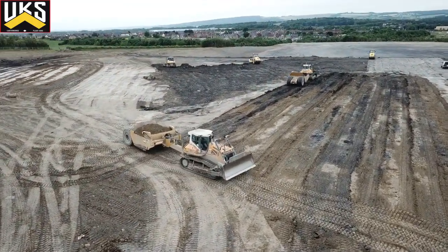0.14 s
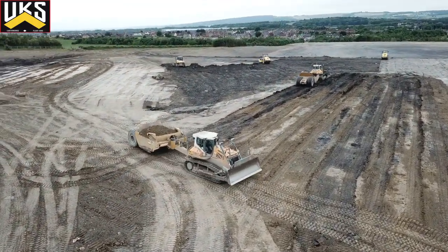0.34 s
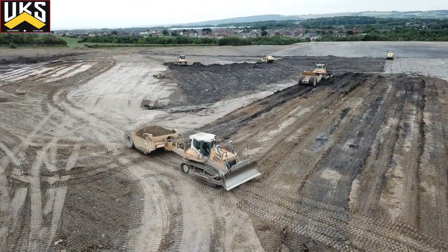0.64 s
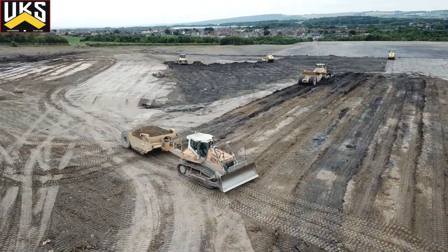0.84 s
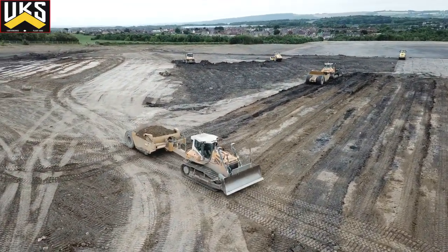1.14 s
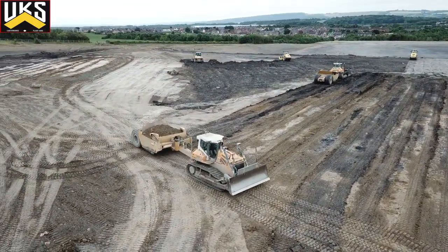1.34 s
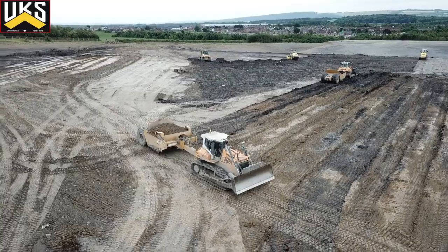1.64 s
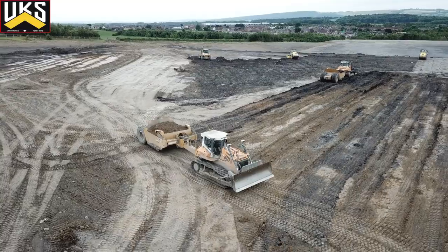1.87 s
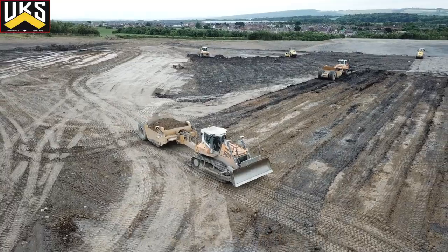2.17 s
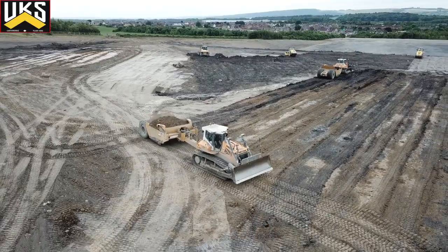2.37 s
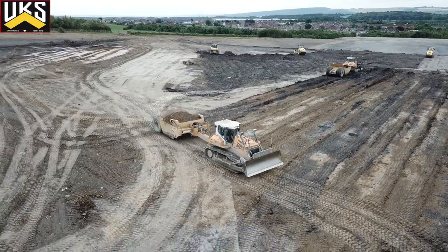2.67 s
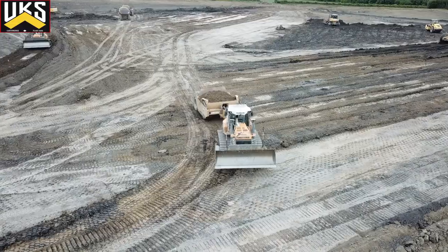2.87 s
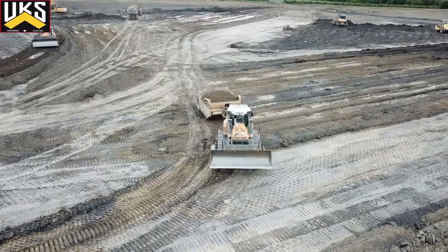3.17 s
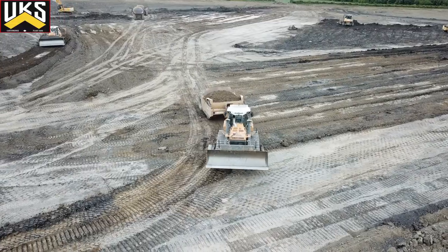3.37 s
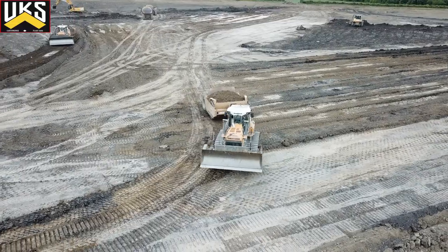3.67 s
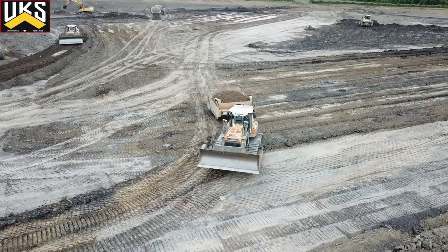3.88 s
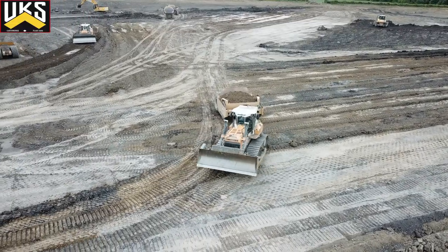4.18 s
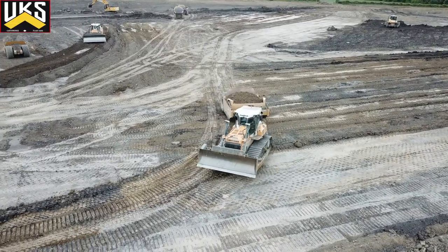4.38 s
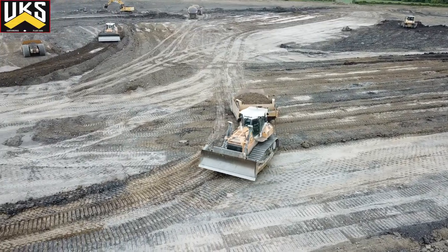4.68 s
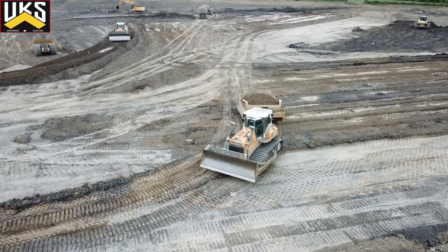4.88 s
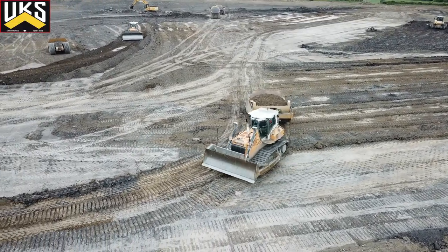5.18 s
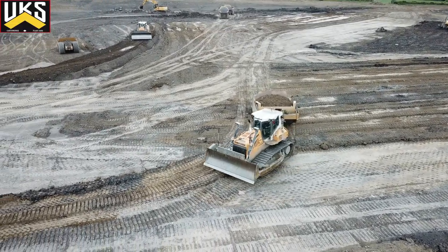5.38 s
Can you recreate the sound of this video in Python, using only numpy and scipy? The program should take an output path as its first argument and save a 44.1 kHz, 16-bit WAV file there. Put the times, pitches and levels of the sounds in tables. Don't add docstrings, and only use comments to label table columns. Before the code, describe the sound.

A tracked dozer roars and clanks over soft ground, fades to a blink of silence, then slowly returns quieter with clanks near the end.

```python
import sys
import numpy as np
from scipy import signal
from scipy.fft import rfft, irfft
from scipy.io import wavfile

SR = 44100
rng = np.random.default_rng(int(sys.argv[2]) if len(sys.argv) > 2 else 0)


def master_out(mix):
    frames = np.transpose(np.atleast_2d(mix))
    ceiling = np.clip(frames, -1, 1)
    pcm = np.round(ceiling * 32767).astype(np.int16)
    wavfile.write(sys.argv[1], SR, pcm)


def volts(x):
    e = np.asarray(x, float) / 20
    return 10 ** e


N = 243431
PASS = int(2.9 * SR)
REPEAT_S = 2.66934
SILENT_S = (2.7435, 2.7515)

# (time [s], roar [dB], hiss relative to roar [dB])
FADER_FIRST = [(0, -46, -41), (.2, -49.5, -42.5), (.44, -45.5, -38), (.8, -44, -38.5), (1.26, -43, -36.5),
               (1.74, -42.5, -39.5), (2.01, -45, -39), (2.26, -49.5, -39), (2.47, -53.5, -38),
               (2.58, -55.5, -40.5), (2.65, -62, -41), (2.69, -66.5, -39), (2.72, -73.5, -37),
               (2.743, -95, -39)]
# (time [s], roar [dB], hiss relative to roar [dB])
FADER_SECOND = [(2.752, -91, -39), (2.78, -82, -33.5), (2.83, -72, -45), (2.9, -74, -32), (3.03, -64, -35),
                (3.2, -62.5, -36), (3.41, -59.5, -38), (3.8, -59, -36), (4.11, -55.5, -37.5),
                (4.24, -51, -37.5), (4.46, -48.5, -39), (4.74, -48.5, -38.5), (5.0, -50.5, -38.5),
                (5.3, -48, -41), (5.52, -51.5, -37)]
# (time [s], peak [dB], low ring [dB], bright ring [dB], rattle length [ms])
CLANKS = [(0.019, -38.5, -3.2, -9.5, 14), (0.052, -69, -16.9, -29, 2.2), (0.094, -50.5, -25, -21, 2.7),
          (0.132, -68, 13.5, -32, 11.9), (0.151, -53.5, 4, -3, 3.9), (0.177, -39, 0, -15, 10.4),
          (0.195, -48.5, -2, -27, 2.9), (0.226, -48.5, 27, -25, 2.6), (0.262, -44.5, 4, -15.8, 2.6),
          (0.287, -41, 14, -14, 1.6), (0.339, -45.5, -3, -3, 13), (0.356, -53.5, 16, -11, 5.5),
          (0.386, -64.5, -3, -6, 15.9), (0.411, -52, 11, -11, 2.4), (0.444, -39, -4.5, -8, 16),
          (0.464, -43, -5.8, -30, 9.2), (0.502, -43.5, -32, -24, 10), (0.556, -43.5, 0, -11, 5.3),
          (0.569, -52.5, -2, -21, 8.7), (0.581, -35, 7.5, -9, 6.9), (0.596, -41, 2, -10, 8.1),
          (0.634, -44, -16.5, -4, 15), (0.659, -48.5, 20, -34, 4.9), (0.689, -41.5, -4, -4, 11),
          (0.708, -35.5, 5, -10.5, 3.9), (0.771, -41, 1, -21, 1.5), (0.818, -43.5, 10, -15, 12),
          (0.83, -41, -14.5, -13, 3.5), (0.863, -39.5, -29, -27, 2.5), (0.901, -41.5, -0.6, -10, 2.6),
          (0.939, -52, 3, -17.0, 2.4), (0.956, -34, 2, -19, 2.3), (0.974, -32, -3, -16.5, 5.9),
          (0.991, -40, -10, -37, 1.1), (1.031, -32.5, -5, -15.5, 6.1), (1.062, -50, 16, -9, 7.8),
          (1.085, -38.5, 3.5, -12, 1.4), (1.111, -56, 18, -27, 6), (1.126, -32.5, -15, -17.5, 3.6),
          (1.141, -40, -16, -21, 21), (1.163, -35, -12.5, -10, 8.2), (1.179, -39, 5, -10, 5.5),
          (1.223, -33.5, -3, -18, 2.3), (1.24, -30.5, -14, -22, 8.1), (1.292, -40, -19, -9, 9.4),
          (1.321, -38.5, -26, -14, 9.6), (1.346, -40, 2.5, -16, 16), (1.386, -30, -8.5, -18, 11.4),
          (1.423, -35.5, -39, -10, 4.6), (1.483, -63, 22.5, -42, 2), (1.495, -50, -26, -8, 2.6),
          (1.506, -32.5, -0.5, -20.5, 9.1), (1.518, -42, -26, -6, 3.2), (1.557, -32.5, -30, -16, 3.1),
          (1.575, -63.5, 0, 11, 10.4), (1.608, -37, 1, -12, 4.2), (1.643, -31.5, 4, -23, 8.5),
          (1.684, -43, 10.5, -3, 1.8), (1.743, -43, 2, -26, 3.3), (1.763, -31, -7.5, -12, 5.5),
          (1.782, -37.5, -34, -19, 2.5), (1.812, -38.8, -10.5, -5.5, 1.8), (1.855, -58, 12, -15, 5.7),
          (1.875, -40, 4, -33, 3.1), (1.904, -37, -22, -23.5, 2.2), (1.916, -36.5, -0.5, -19, 6.9),
          (1.95, -44, -16, -48, 12), (2.001, -41.5, -25, -36, 1.7), (2.031, -36, -12, -11, 6.6),
          (2.081, -38.5, -8.5, -42, 2), (2.11, -61, -6, -36, 2.7), (2.137, -39.8, -2, -56, 4),
          (2.16, -34, -24, -20, 2), (2.212, -44, 5.5, -12.5, 1.4)]
# (time [s], peak [dB], low ring [dB], bright ring [dB], rattle [ms])
LATE_CLANKS = [(4.936, -46, 7, -54, 1.9), (4.97, -39, -29, -67, 1.7), (5.002, -41.5, 1.5, -21, 5.1),
               (5.068, -42, 9, -21, 3.6), (5.093, -36, -25, -10.5, 4.4), (5.145, -41, 8, -13.5, 0.87),
               (5.175, -50, -26, -18, 26), (5.199, -41.5, -12, -14, 15), (5.233, -40.5, 4, -29, 2.5),
               (5.253, -50, -6, -19, 2.4), (5.274, -45.5, 8, -12, 1.8), (5.326, -46.2, 11, -35, 7.2),
               (5.337, -51.5, 0, -18.2, 3.6), (5.355, -40, 5, -12, 3.7), (5.376, -43, 0, -26, 9.8),
               (5.408, -42, 4, -43, 5.6), (5.462, -40.5, 3, -17.5, 24), (5.48, -41.5, -4, -21.2, 4.3),
               (5.502, -35.5, -11.5, -25, 3.9)]
# (frequency [Hz], level [dB], time to fall 60 dB [s])
LOW_RING = [(314, -14.5, 0.01), (409, -13, 0.055), (482, -1, 0.048), (569, -8.5, 0.078), (698, -5.5, 0.069)]
# (frequency [Hz], level [dB], time to fall 60 dB [s])
MID_RING = [(781, 2, 0.044), (946, -1.5, 0.076), (1097, 1, 0.04), (1232, 0, 0.049), (1327, 2.5, 0.042),
            (1470, -7, 0.075), (1672, -5.5, 0.029), (1862, -8, 0.047)]
# (frequency [Hz], level [dB], time to fall 60 dB [s])
BRIGHT_RING = [(1990, 4, 0.025), (2310, 2, 0.02), (2670, -19, .012), (3060, -2, 0.031), (3300, -2.5, 0.022),
               (3330, -17.5, 0.014), (4460, -28, .01), (4590, -8.5, 0.0087), (4980, -13, 0.013)]
# (lowest frequency [Hz], highest frequency [Hz])
RING_BANDS_HZ = [
    (240, 980),
    (450, 2280),
    (1400, 5600),
]
# (frequency [Hz], level per Hz [dB])
ROAR = [(40, -28), (62, -37), (150, -14.5), (380, 0), (712, 0.5), (1350, 0.5), (1950, -10.5), (2150, -16),
        (2600, -18.5), (3100, -17), (3650, -20), (3950, -30.5), (5500, -33.5), (6000, -48.5)]
# (time into the pass [s], roar tilt about 1 kHz [dB per octave])
TURNING = [
    (0, -1),
    (.25, 3.2),
    (.45, -0.8),
    (1.0, 0),
    (1.6, -0.03),
    (2.2, -0.5),
    (2.9, 1),
]
# (frequency [Hz], width [Hz], level relative to roar [dB])
ENGINE_HUM = [(283.4, 15, -33.5), (560, 12, -19.5), (715, 17, -12.5), (1995, 77, -29), (2421, 37, -32),
              (2970, 42, -34), (3127, 20, -32), (3360, 50, -34), (3500, 35, -41), (4340, 37, -43.5),
              (4450, 17, -43), (4550, 17, -43)]
# (frequency [Hz], level per Hz [dB])
HISS = [(4500, -9), (6000, -1.5), (7000, -6), (8200, -4.5), (9400, -1), (12500, -3.5), (13600, -3.5),
        (13900, -22)]
# (frequency [Hz], width [Hz], level relative to hiss [dB])
WHINE = [(7070, 670, -10), (9600, 410, -15.5), (10880, 860, -7.5), (13230, 480, -4)]
# (time into the pass [s], level [dB])
WHINE_SWELL = [
    (0, 18),
    (.3, -1),
    (.8, -18),
    (1.4, 0),
    (1.7, 4),
    (2.4, 5),
    (2.9, 2),
]


def rms_one(x):
    return x / np.sqrt(np.mean(x ** 2) + 1e-20)


def drift(rate):
    r = np.exp(-80 * np.pi * rate / SR)
    white = rng.standard_normal(PASS // 40 + 2002)
    slow = signal.lfilter([1], [1, -2 * r, r * r], white)[2000:]
    return np.interp(np.arange(PASS) / 40, np.arange(len(slow)), rms_one(slow))


def ring(force, hz, t60):
    r = volts(-60 / (t60 * SR))
    w = 2 * np.pi * hz / SR
    return signal.lfilter([0, np.sin(w)], [1, -2 * r * np.cos(w), r * r], force + 1e-18)


def narrow_noise(hz, width_hz):
    t60 = np.log(1000) / np.pi / width_hz
    once = ring(rng.standard_normal(PASS), hz, t60)
    return rms_one(ring(once, hz, t60))


def coloured(spectrum):
    hz, db = np.transpose(spectrum)
    bins = np.fft.rfftfreq(PASS, 1 / SR) + 1
    gain = volts(np.interp(np.log(bins), np.log(hz), db))
    return rms_one(irfft(rfft(rng.standard_normal(PASS)) * gain, PASS))


def roar(patchy_db, throb_db):
    body = rfft(coloured(ROAR))
    together = drift(25)
    tilt_db = np.interp(np.arange(PASS) / SR, *np.transpose(TURNING))
    place = np.log2(np.fft.rfftfreq(PASS, 1 / SR) / 1000 + 1e-6) * 1.5
    out = np.zeros(PASS)
    for band in range(-8, 5):
        share = np.clip(1 - np.abs(place - band), 0, 1)
        octaves = max(band, -4) / 1.5
        flicker_db = patchy_db * drift(16) + throb_db * together
        out += irfft(body * share, PASS) * volts(flicker_db + tilt_db * octaves)
    return rms_one(out)


def engine_hum():
    load = np.clip(np.arange(PASS) / SR / 0.63, .4, 1)
    return load * sum(volts(level_db) * narrow_noise(hz, width_hz) for hz, width_hz, level_db in ENGINE_HUM)


def whine():
    return sum(volts(level_db) * narrow_noise(hz, width_hz) for hz, width_hz, level_db in WHINE)


def hiss(patchy_db):
    tones = whine()
    s, swell_db = np.transpose(WHINE_SWELL)
    swell = volts(np.interp(np.arange(PASS) / SR, s, swell_db))
    total = np.sqrt(1 + swell ** 2 * np.mean(tones ** 2))
    return (coloured(HISS) + swell * tones) / total * volts(patchy_db * drift(30))


def rattles(length_ms, touches_per_s):
    age_ms = np.arange(1500) / SR * 1000
    touched = rng.random((len(length_ms), 1500)) < touches_per_s / SR
    touched[:, 0] = True
    fade = np.exp(-(age_ms / np.clip(length_ms[:, None], 3, 25)) ** 4)
    rattle = touched * fade * rng.choice([-1, 1], touched.shape)
    rattle[:, 0] *= 1.8
    return rattle / np.sqrt(np.sum(rattle ** 2, axis=1, keepdims=True))


def tracks(strike_db, thump_db, touches_per_s, spread_db):
    contacts = np.array(list(CLANKS) + list(LATE_CLANKS))
    time_s, peak_db, low_db, bright_db, length_ms = contacts.T
    strength_db = peak_db - fader(time_s)[0] + strike_db
    pass_s = time_s - REPEAT_S * (time_s > REPEAT_S + .1)
    start = np.round((pass_s - .001) * SR).astype(int)
    rattle = rattles(length_ms, touches_per_s)
    at = np.minimum(start[:, None] + np.arange(1500), PASS - 1).ravel()
    out = np.zeros(PASS)
    families = zip((LOW_RING, MID_RING, BRIGHT_RING), (low_db, 0, bright_db), RING_BANDS_HZ)
    for modes, family_db, band_hz in families:
        family = np.zeros(PASS)
        for hz, level_db, t60 in modes:
            chance_db = spread_db * rng.standard_normal(len(contacts))
            size = volts(strength_db + family_db + level_db + chance_db)
            size = size * rng.choice([-1, 1], len(contacts))
            force = np.bincount(at, (size[:, None] * rattle).ravel(), PASS)
            family += ring(force, hz, t60)
        out += signal.sosfilt(signal.butter(4, band_hz, "band", fs=SR, output="sos"), family)
    weight = np.bincount(start, volts(strength_db + thump_db), PASS)
    soft = signal.sosfilt(signal.butter(2, 70, fs=SR, output="sos"), weight)
    return out + ring(soft, 59, 0.056)


def squeeze(x, top):
    extra = top * np.tanh(x / top) - x
    capsule = signal.butter(3, [250, 4200], "band", fs=SR, output="sos")
    return x + signal.sosfiltfilt(capsule, extra)


def fader(seconds):
    s, roar_db, hiss_db = np.transpose(list(FADER_FIRST) + list(FADER_SECOND))
    return np.interp(seconds, s, roar_db), np.interp(seconds, s, roar_db + hiss_db)


def play_twice(x):
    t = np.arange(N) / SR
    again = t > SILENT_S[1]
    sounding = again | (t < SILENT_S[0])
    return x[np.arange(N) - again * round(REPEAT_S * SR)] * sounding


def scene():
    machine = volts(-2.5) * roar(patchy_db=0.93, throb_db=1.2)
    machine += engine_hum()
    machine += tracks(strike_db=-5, thump_db=-36, touches_per_s=1300, spread_db=1.9)
    machine = squeeze(machine, top=4.8)
    air = hiss(patchy_db=1.46)
    roar_db, hiss_db = fader(np.arange(N) / SR)
    mix = volts(roar_db) * play_twice(machine) + volts(hiss_db) * play_twice(air)
    return mix[None]


def band_limit(x):
    return signal.sosfilt(signal.butter(12, 14530, fs=SR, output="sos"), x)


def record(dry):
    mix = dry + volts(-104) * rng.standard_normal(dry.shape)
    return band_limit(mix)


dry = scene()
out = record(dry)
master_out(out)
```